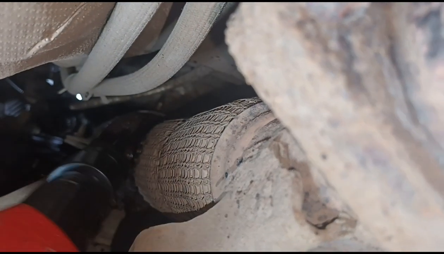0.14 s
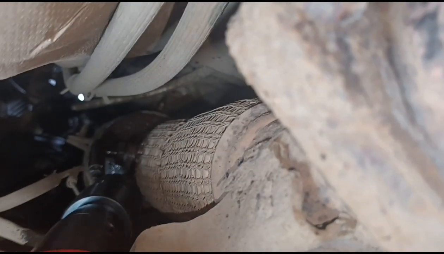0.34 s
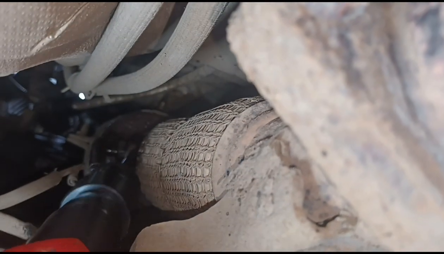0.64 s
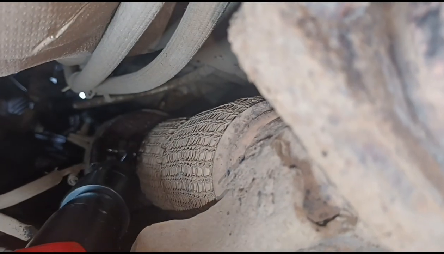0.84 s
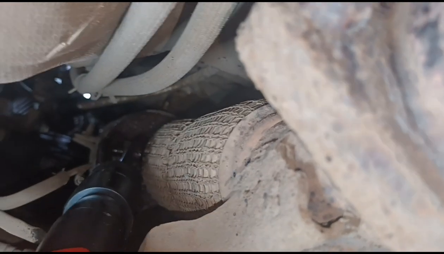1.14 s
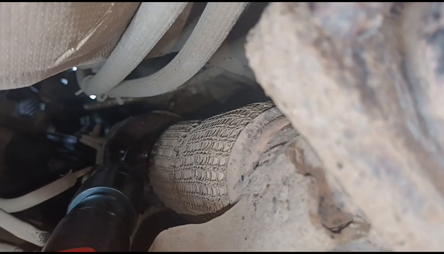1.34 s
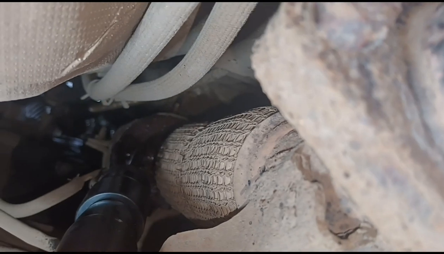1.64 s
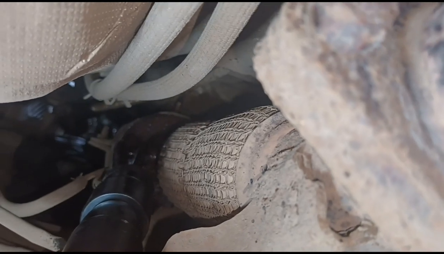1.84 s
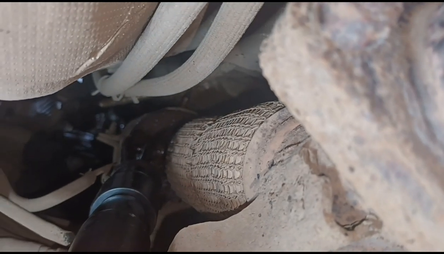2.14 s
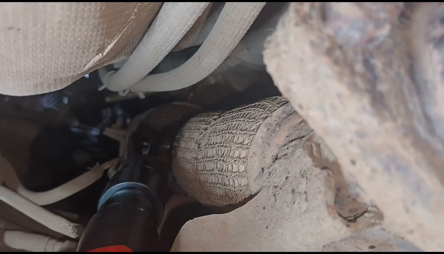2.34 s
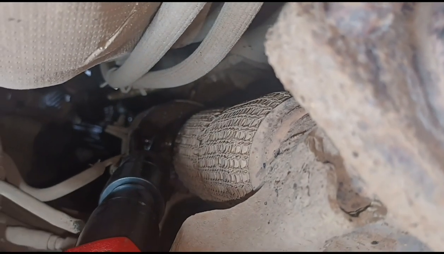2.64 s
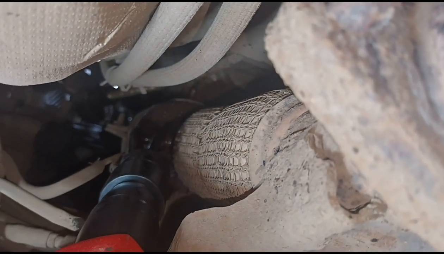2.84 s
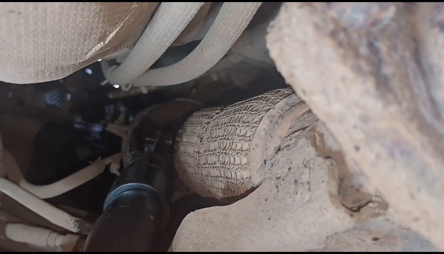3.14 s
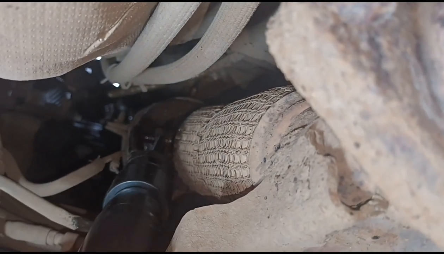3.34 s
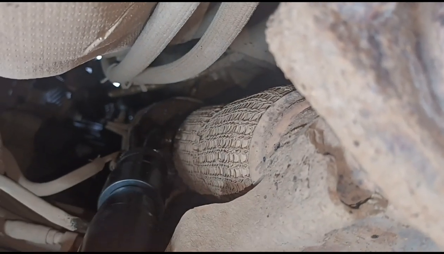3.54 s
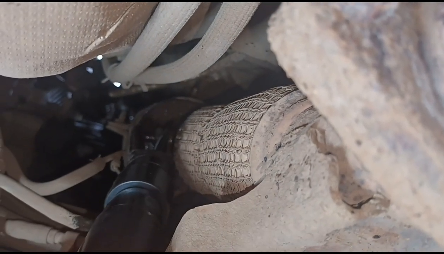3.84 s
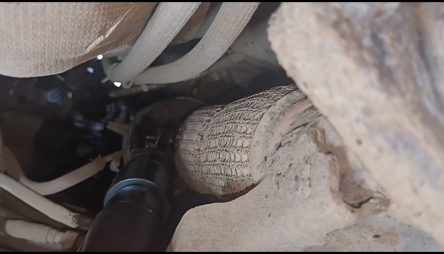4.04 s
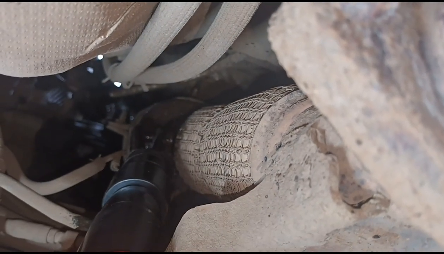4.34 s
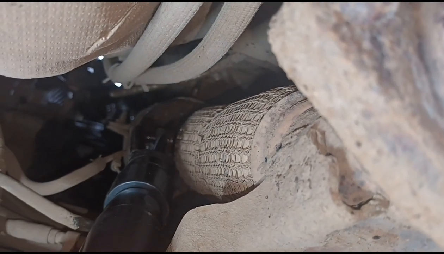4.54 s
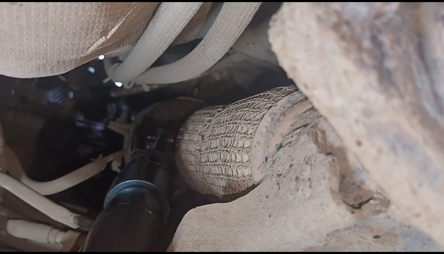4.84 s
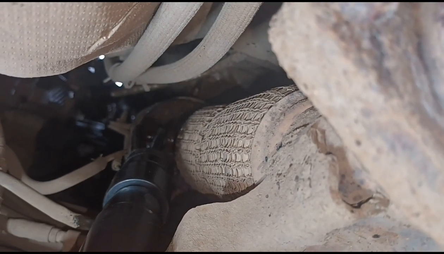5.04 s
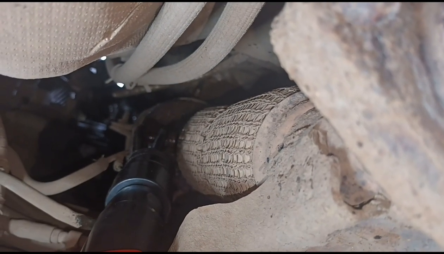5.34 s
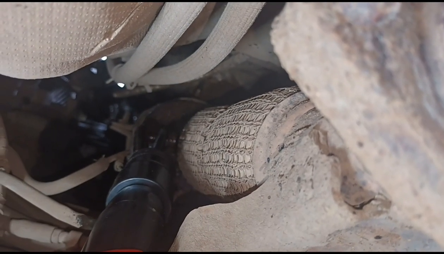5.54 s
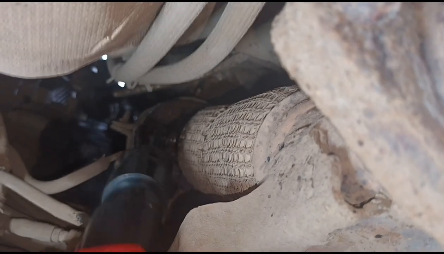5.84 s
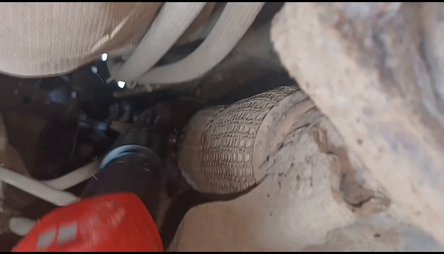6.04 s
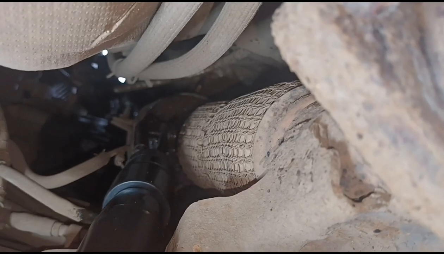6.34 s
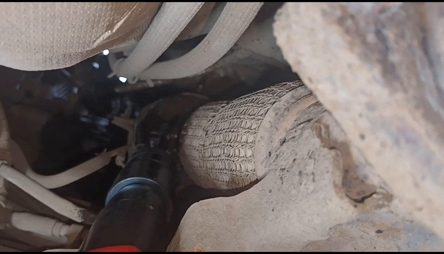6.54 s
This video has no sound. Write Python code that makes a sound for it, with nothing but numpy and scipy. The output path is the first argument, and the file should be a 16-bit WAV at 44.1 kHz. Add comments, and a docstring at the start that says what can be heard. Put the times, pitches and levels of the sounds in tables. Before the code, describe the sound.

An air tool is positioned against a seized metal part. First come gritty scraping, short high squeaks, soft hollow pipe bumps and bright jingles, then mostly quiet with small ticks and a few crisp steel clinks. Suddenly a very loud, fraction-of-a-second hammer burst cracks and blasts air, followed by a dull ringing hit and irregular chisel chatter as air bleeds away. Close microphone, grip rustle, hard metal reflections, quiet workshop.

```python
"""A tool scrapes, squeaks and jingles along a car's underbody, its loose chisel clinking; then an air hammer fires.
Scrapes are shaped noise with ringing grit, squeaks are gliding tones, clinks and bumps are struck modes with noise.
The burst is a few piston blows with exhaust blasts, a last dull stroke and a rattle as the air bleeds off.
The hand-held camera is very close, its grip sways and rubs, and the workshop is quiet."""
import sys
import numpy as np
from scipy import signal
from scipy.fft import rfft, irfft, next_fast_len
from scipy.io import wavfile
from scipy.ndimage import uniform_filter1d, map_coordinates

SR = 44100
rng = np.random.default_rng(int(sys.argv[2]) if len(sys.argv) > 2 else 0)


def materialize(psi):
    """Save the field psi as 16-bit PCM at rate SR to the path in sys.argv[1].

    A 1-D psi becomes a single channel; in a 2-D psi each row is a channel.
    """
    bounded = np.clip(np.atleast_2d(psi).T, -1, 1)
    quanta = np.round(bounded * 32767).astype(np.int16)
    wavfile.write(sys.argv[1], SR, quanta)


N = 295602
AGE = np.arange(SR) / SR  # time since a hit (s)

# Spectrum of the air leaving the exhaust. Each row: frequency in Hz, relative level in dB per Hz.
EXHAUST_SPECTRUM = [(88, -29.5), (150, 2.5), (213, -8.5), (254, -2.5), (391, -2.5), (774, -7),
                    (1080, -11.5), (1530, -4.5), (1900, -8.5), (4580, -5.5), (8070, -9.5), (9080, -5),
                    (12700, -15.5), (15100, -9.5), (16000, -33)]


def amp(db):
    """Decibels to gain."""
    return 10 ** (np.asarray(db) / 20)


def unit(x):
    """Scale to rms 1."""
    return x / np.sqrt(np.mean(x ** 2) + 1e-20)


def along(points, hz):
    """Read (Hz, value) points on a log frequency axis."""
    f, v = np.transpose(points)
    return np.interp(np.log(hz + 1), np.log(f + 1), v)


def wobble(rate):
    """A smooth random curve with rate knots a second."""
    knots = rng.standard_normal(int(N * rate / SR) + 4)
    return map_coordinates(knots, [np.arange(N) * rate / SR])


def filtered(x, response):
    """Multiply the spectrum of x by a response of frequency."""
    m = next_fast_len(x.shape[-1] + SR // 8)
    spectrum = rfft(x, m) * response(np.fft.rfftfreq(m, 1 / SR))
    return irfft(spectrum, m)[..., :x.shape[-1]]


def noise(spectrum, size=N):
    """Coloured stereo noise of rms 1, with a left-right likeness set per frequency."""
    # Each row: frequency in Hz, left-right likeness (correlation).
    likeness = [(40, 0.26), (150, 0.8), (500, 0.12), (1500, 0.027), (12000, 0.079)]

    def response(hz):
        turn = np.arccos(np.clip(along(likeness, hz), -1, 1)) / 2
        return amp(along(spectrum, hz)) * [np.cos(turn), np.sin(turn)]

    mid, side = filtered(rng.standard_normal((2, size)), response)
    return unit(np.array([mid + side, mid - side]))


def patchy(x, depth_db):
    """Short-lived resonances come and go in a noise as the contact or the air path changes."""
    z = signal.stft(x, nperseg=512)[2]
    field = uniform_filter1d(rng.standard_normal(z.shape[1:]), size=4, axis=0)
    field = uniform_filter1d(field, size=9, axis=1)
    return unit(signal.istft(z * amp(depth_db * unit(field)), nperseg=512)[1][:, :N])


def fade(t60, attack):
    """Envelope of a hit: exponential rise and decay."""
    return np.exp(-np.log(1000) * AGE / t60) * (1 - np.exp(-AGE / attack))


def ring(modes, attack, scatter_db, size=SR):
    """Struck modes (Hz, dB, t60 s), reaching each microphone at its own strength and phase."""
    t, out = AGE[:size], 0
    for hz, db, t60 in modes:
        strength = amp(db + scatter_db * rng.standard_normal((2, 1)))
        tone = np.sin(2 * np.pi * (hz * t + rng.random((2, 1))))
        out = out + strength * np.exp(-np.log(1000) * t / t60) * tone
    return out * (1 - np.exp(-t / attack))


def grit(hz, spread, cycles, scatter_db, count):
    """Half a second of tiny steel contacts: damped notes near hz, each 60 dB down after some cycles."""
    t = AGE[:SR // 50]
    start = rng.integers(SR // 2, size=(count, 1))
    pitch = hz * np.exp(spread * rng.standard_normal((count, 1)))
    strength = amp(scatter_db * np.minimum(rng.exponential(size=(count, 1)), 2))
    decay = np.exp(-np.log(1000) * t * pitch / cycles)
    notes = strength * decay * np.sin(2 * np.pi * (pitch * t + rng.random((2, count, 1))))
    where = (start + np.arange(len(t))).ravel()
    return unit(np.array([np.bincount(where, side.ravel(), SR)[:SR // 2] for side in notes]))


def stroke(s, length, attack, fall_db_per_s, swell_db=0):
    """Envelope of a movement: it rises, lasts for its length while swelling by swell_db, then dies away."""
    t = np.arange(N) / SR - s
    held_db = swell_db * (np.clip(t / length, 0, 1) - .5)
    return np.clip(t / attack, 0, 1) * amp(held_db - fall_db_per_s * np.maximum(t - length, 0))


def sides(pan_db):
    """Left and right gains for a left-minus-right level difference."""
    return amp(np.array([[.5], [-.5]]) * pan_db)


def add(track, s, sound):
    """Mix a sound into the track at time s."""
    room = track[:, round(s * SR):][:, :sound.shape[-1]]
    room += sound[..., :room.shape[1]]


def quiet_workshop():
    """The workshop at rest is a steady, faint noise, strongest in the bass."""
    # Each row: frequency in Hz, relative level in dB per Hz.
    rest_spectrum = [(12, -31), (20, -10), (65, -7), (182, -11.5), (270, -12.5), (590, -27.5), (897, -23),
                     (1300, -24), (2670, -28), (3440, -30), (9140, -33.5), (16000, -46)]
    return amp(-68.5) * noise(rest_spectrum)


def handling():
    """The grip sways and rubs on the camera body: faintly all the time, more at each shift."""
    # Each row: start in seconds, length in seconds, sway in dB, rub in dB, left minus right in dB.
    shifts = [(0.0, 0.053, -29, -39.5, 3), (0.374, 0.055, -51.5, -54.5, -12), (0.587, 0.021, -48.5, -49, 2),
              (0.879, 0.035, -53, -47.5, 0.5), (0.972, 0.037, -68, -53.5, -1), (1.184, 0.2, -53, -50, -0.5),
              (1.782, 0.27, -60.5, -52.5, -1), (2.386, 0.3, -61.5, -57, -2.5),
              (2.763, 0.023, -74, -49.5, -1), (3.076, 0.031, -60, -57.5, -3), (3.454, 0.057, -57, -67, 9.5),
              (3.649, 0.026, -47.5, -72, 3), (3.717, 0.042, -46, -56.5, -5.5),
              (3.872, 0.095, -55.5, -68, -9), (4.215, 0.34, -66, -60.5, -1.5), (5.752, 0.15, -45, -59.5, 7),
              (5.983, 0.039, -55, -56.5, -5), (6.163, 0.055, -49, -59.5, -9),
              (6.646, 0.043, -51, -72, -22.5)]
    # Each row: frequency in Hz, relative level in dB per Hz.
    sway_spectrum = [(11, -64.5), (18, -1.5), (75, 6), (92, -1.5), (110, -0.5), (140, -35.5), (240, -120)]
    rub_spectrum = [(41, -28.5), (70, -4.5), (123, -4), (215, -7.5), (306, -16.5), (338, -23.5), (600, -28),
                    (780, -43.5), (1320, -120)]
    restless_db, rest_sway_db, rest_rub_db = 1.5, -66, -66
    restless = amp(restless_db * wobble(11))
    sway, rub = amp(rest_sway_db) * restless, amp(rest_rub_db) * restless
    for s, length, sway_db, rub_db, pan_db in shifts:
        move = sides(pan_db) * stroke(s, length, attack=0.0062, fall_db_per_s=227)
        sway = np.maximum(sway, amp(sway_db) * move)
        rub = np.maximum(rub, amp(rub_db) * move)
    return sway * noise(sway_spectrum) + rub * noise(rub_spectrum)


def slides():
    """Tool and hose catch on countless small ridges: hiss, rasp, and grit ringing at the spot touched."""
    # Each row: start, rise and length in seconds, rasp in dB, hiss in dB, grit in dB, grit pitch in Hz.
    strokes = [(0.093, 0.13, 0.17, -41.5, -50, -45.5, 4700), (0.251, 0.03, 0.079, -54, -56.5, -52, 2790),
               (0.335, 0.015, 0.064, -44.5, -43.5, -46, 2440), (0.405, 0.022, 0.068, -54.5, -62, -57, 1750),
               (0.934, 0.018, 0.066, -56, -49.5, -51, 1744), (1.393, 0.018, 0.026, -67, -63, -62, 1940),
               (1.486, 0.06, 0.091, -55, -48, -58, 2160), (2.069, 0.021, 0.071, -65.5, -52.5, -64, 2210),
               (2.194, 0.02, 0.076, -71, -73, -71, 1990), (2.482, 0.045, 0.2, -75, -77.5, -76.5, 2070),
               (2.689, 0.084, 0.086, -59, -56, -56.5, 2750), (2.775, 0.014, 0.015, -52, -53.5, -50, 1680),
               (2.995, 0.027, 0.093, -60.5, -65, -63, 5500), (3.273, 0.007, 0.015, -63, -72.5, -63, 1470),
               (3.311, 0.034, 0.045, -61.5, -53.5, -59.5, 4670),
               (3.371, 0.039, 0.08, -69.5, -65.5, -67, 2240), (2.814, .01, 0.013, -72, -67, -66, 1950),
               (3.802, 0.037, 0.053, -79, -74, -70, 1930), (3.9, 0.016, 0.054, -71, -69.5, -68, 2110),
               (3.949, 0.034, 0.12, -80, -76, -78.5, 2100), (4.554, 0.0081, 0.05, -69.5, -56.5, -68, 2450),
               (5.167, .02, 0.039, -81.5, -75, -77, 4790)]
    # Each row: frequency in Hz, relative level in dB per Hz.
    rasp_spectrum = [(290, -37.5), (500, -15.5), (770, -22.5), (892, -19), (1080, -1.5), (1350, -2),
                     (1720, -4), (2180, -17), (2740, -9), (3200, -13), (4500, -12.5), (5850, -34.5),
                     (9900, -120)]
    hiss_spectrum = [(2060, -22.5), (3500, -13), (5430, 2), (6610, 3.5), (8050, -5.5), (9560, 3),
                     (12300, -22.5), (14800, -18), (16000, -15.5)]
    fall_db_per_s = 302.5
    rasp_swell_db, hiss_swell_db = 6, -5.5  # the hand presses harder through a stroke
    rasp, hiss, grains = np.zeros(N), np.zeros(N), np.zeros((2, N))
    for s, rise, length, rasp_db, hiss_db, grit_db, hz in strokes:
        pressure = stroke(s, length, rise, fall_db_per_s, rasp_swell_db)
        rasp = rasp + amp(rasp_db) * pressure
        hiss = hiss + amp(hiss_db) * stroke(s, length, rise, fall_db_per_s, hiss_swell_db)
        crunch = grit(hz, spread=.075, cycles=40, scatter_db=4.5, count=500)
        add(grains, s, amp(grit_db) * crunch * pressure[round(s * SR):][:SR // 2])
    catching = unit(amp(2 * wobble(140) + 2.2 * wobble(900)))
    rasping = rasp * patchy(noise(rasp_spectrum), depth_db=4.0)
    hissing = hiss * patchy(noise(hiss_spectrum), depth_db=3.0)
    return catching * (rasping + hissing) + grains


def squeaks():
    """Metal sticks and slips: a short rough tone that mostly sinks as the slip slows. Two rows instead carry on
    the high note of the pipework woken by a bump, and one the note of a struck spot."""
    # Each row: start in seconds, length in seconds, pitch in Hz, level in dB, drop in pitch as a share, jitter
    # of the pitch as a share. The rows at 0.01 s and 0.944 s are the high note of the pipework, woken by the
    # bumps there; the last row is the ringing note of the clink at 5.968 s.
    slips = [(0.01, 0.086, 2660, -58, .02, .035), (0.251, 0.086, 2830, -44, .02, .025),
             (0.337, 0.06, 2660, -43, 0.037, 0.034), (0.448, 0.071, 2750, -48, 0.0086, 0.021),
             (0.631, 0.064, 3160, -51.5, .03, 0.055), (0.655, 0.099, 3660, -57, .05, .03),
             (0.714, 0.055, 3090, -53, .06, 0.059), (0.725, 0.075, 2780, -50, 0, .02),
             (0.944, 0.051, 2755, -45, 0.023, 0.026), (2.001, 0.075, 4640, -63, 0.016, 0.05),
             (2.038, 0.057, 3380, -63.5, .04, 0.045), (2.688, 0.13, 2760, -56, 0.0071, 0.014),
             (3.558, 0.018, 2900, -44.5, .12, 0.075), (3.799, 0.13, 3800, -54.5, 0.22, 0.072),
             (5.362, 0.018, 2810, -53.5, .03, .08), (5.966, 0.013, 1574, -44, 0.037, 0.037)]
    out = np.zeros((2, N))
    for s, length, hz, db, sag, rough in slips:
        size = round(length * SR)
        pitch = hz * (1 + sag * np.linspace(.5, -.5, size) + rough * wobble(895)[:size])
        phase = np.cumsum(pitch) / SR + rng.random((2, 1))
        add(out, s, amp(db) * np.hanning(size) * np.sin(2 * np.pi * phase))
    return out


def jingles():
    """The loose sleeve of the hose coupling rings high and thin, with a fizz of tiny rebounds."""
    # Each row: start in seconds, level in dB before trim.
    hits = [(0.4225, -37), (0.463, -48.5), (0.6254, -29), (0.636, -29), (0.7162, -30.5), (0.7426, -45),
            (0.7733, -47.5)]
    # Each row: frequency in Hz, level in dB, t60 in seconds.
    sleeve_modes = [(2840, -20.5, 0.28), (3250, -21, 0.14), (4270, -27, 0.14), (6860, -19.5, 0.15),
                    (9200, -1, 0.053), (9320, 10.5, 0.033), (9670, 17.5, 0.0093), (14580, -7, 0.046),
                    (14960, -5.5, 0.046)]
    fizz_spectrum = [(1000, -19.0), (5000, -15.0), (8500, -14.5), (9600, 2.5), (12000, -31.5),
                     (14800, -7.5), (16000, -15.0)]
    out = np.zeros((2, N))
    for s, db in hits:
        fizz = noise(fizz_spectrum, size=SR) * fade(t60=0.12, attack=0.0038)
        rocking = 1 + .5 * wobble(120)[:SR]
        sleeve = rocking * ring(sleeve_modes, attack=.004, scatter_db=2.5)
        add(out, s, amp(db - 4.5) * (sleeve + amp(-5.0) * fizz))
    return out


def bumps():
    """Soft contacts with the underbody give a thud and wake a hollow, quickly damped note of the pipework."""
    # Each row: start in seconds, level in dB, thud and ring in dB re level, all before trim.
    contacts = [(0.011, -37, 11.5, -9), (0.049, -31, -17, -17.5), (0.208, -28.5, 1, -4),
                (0.262, -38, -8, 0), (0.604, -51, -12, -10), (0.891, -41.5, -6, -2), (0.95, -30, -8.5, -11),
                (2.729, -35, -1, -9), (2.783, -62, 18.5, -44), (3.104, -33, 8.5, -24),
                (3.498, -47, -18.5, -2), (4.569, -52.5, -12, -4), (6.338, -43.5, 21.5, 1.5),
                (6.458, -42, -11.5, -1)]
    # Each row: frequency in Hz, level in dB, t60 in seconds.
    pipe_modes = [(890, 0, .1), (860, -7, .07), (925, -7, .07), (893, -13, .3), (2730, -16, .1),
                  (2650, -19, .06)]
    thud_spectrum = [(40, -27.5), (130, -15.0), (230, -8.5), (335, 2.0), (450, -14.5), (900, -49), (2000, -120)]
    rise_s = 0.016
    swell = np.minimum(AGE / rise_s, 1)
    out = np.zeros((2, N))
    for s, db, thud_db, ring_db in contacts:
        thud = noise(thud_spectrum, size=SR) * fade(t60=0.17, attack=0.015)
        rough = 1 + .35 * wobble(70)[:SR]
        note = swell * rough * ring(pipe_modes, attack=rise_s, scatter_db=1.5)
        add(out, s, amp(db + thud_db - 14.5) * thud)
        add(out, s, amp(db + ring_db + 6.5) * amp([[3], [-5]]) * note)  # stronger on the left
    return out


def clinks():
    """Loose steel contacts, and the click of the air valve opening: a crack and the chisel's modes, coloured by
    each touch, and the struck spot's note."""
    # Each row: start in seconds, level in dB, body and top in dB re level, t60 of the crack in seconds, note of
    # the spot struck in Hz, note in dB re level; levels before trim. The row at 5.412 s is the air valve
    # clicking open at the trigger.
    touches = [(0.008, -44.5, 0, -2.5, 0.15, 1563, -7), (0.146, -28, -5, -50, .06, 3580, -11),
               (0.232, -26, -6, -13, 0.061, 1810, -21), (0.259, -19, -8.5, -15.5, 0.064, 1850, -25),
               (0.812, -59, 5, -12, 0.026, 2780, -13), (0.87, -58, 0.5, -6, 0.088, 2470, -3),
               (0.951, -38.5, -25, -4.5, 0.074, 2630, -7), (1.502, -46.5, -7, -6, .054, 2230, -6),
               (2.081, -38, -27, -4, 0.12, 4600, -18), (2.785, -41.5, 7.5, -14, .04, 3480, -2),
               (3.076, -29, -6.5, -19, 0.017, 1390, -22), (3.1, -37.5, 0.5, -41, 0.038, 3250, -6),
               (3.143, -28, -5.5, -14, 0.037, 1457, -7.5), (3.149, -13, -13, -17, .03, 8950, -22),
               (3.183, -44, -0.5, -29, 0.043, 3400, -11), (3.288, -56, 2, -25, 0.038, 1414, 3),
               (3.439, -17, -5.5, -8.5, 0.043, 3340, -16), (3.445, -10.5, -9, -10, 0.052, 2153, -19),
               (3.451, -16, -4.5, -13.5, 0.06, 9030, -16.5), (3.49, -45, 3.5, -30.5, 0.035, 3380, -1),
               (3.502, -30.5, 3, -17, .04, 2165, -3), (3.505, -44.5, 5, -20, .04, 1017, 6.5),
               (3.519, -49.5, 10.5, -31.5, 0.058, 2170, 10), (3.583, -47, -0.5, -35, 0.028, 3100, -9),
               (4.559, -47.5, -16.5, -7.5, 0.046, 4340, -14),
               (4.842, -42.5, -17.5, -16.5, 0.042, 4770, -27), (5.034, -53.5, -3, -16.5, 0.032, 2688, -12),
               (5.412, -25, -10, -15.5, .04, 3302, -19.5), (5.676, -16, -23, -12.5, 0.059, 5560, -18),
               (5.698, -6.5, -18.5, -14.5, 0.044, 2880, -31), (5.745, -25, 1.5, -18, 0.045, 1600, -16),
               (5.761, -19.5, -3, -26, .021, 2960, -14), (5.782, -16.5, -17, -6.5, 0.028, 7100, -19),
               (5.828, -3.5, -19.5, -22.5, 0.023, 2913, -30.5),
               (5.866, -14, -13.5, -27.5, 0.029, 1820, -27), (5.914, -50, -8, -26, 0.022, 2950, -10),
               (5.968, -39, -2.5, -10, .05, 1545, -0.5), (6.052, -57.5, -1.5, -20, 0.03, 1590, -9)]
    # Each row: frequency in Hz, level in dB, t60 in seconds.
    chisel_modes = [(2165, -7.5, .1), (3448, -10, .065), (5170, -10, .055), (6627, -18, .05),
                    (7370, -9, .05), (8900, -13.5, .029), (8950, 6.5, 0.076), (9700, -7, .05),
                    (9700, -12, .047), (13590, -13.5, .042), (15340, -15.5, .035)]
    # Crack of steel on steel. Each row: frequency in Hz, relative level in dB per Hz.
    crack_spectrum = [(240, -60), (400, -33), (950, -14), (2120, -7), (2510, -11.5), (3420, 0.5),
                      (3870, -10), (7990, -11.5), (8630, -2), (9610, -1), (10900, -28), (16000, -22)]
    out, size = np.zeros((2, N)), SR // 4
    for s, db, body_db, top_db, crack_t60, note_hz, note_db in touches:
        crack = noise(crack_spectrum, size=size) * fade(crack_t60, attack=0.0012)[:size]
        seat = 1 + 0.01 * rng.standard_normal(len(chisel_modes))  # how the chisel sits shifts its modes
        seated = [(hz * k, level, t60) for (hz, level, t60), k in zip(chisel_modes, seat)]
        chisel = ring(seated, attack=0.001, scatter_db=1.5, size=size)
        colour = [(900, body_db + 9.5), (3000, body_db + 4.0), (5500, 0.93),
                  (9000, top_db + 5.5), (14000, top_db + 5.5)]
        clink = filtered(crack + amp(-11) * chisel, lambda hz: amp(along(colour, hz)))
        note = ring([(note_hz, note_db, .075)], attack=.0015, scatter_db=0.5, size=size)
        add(out, s, amp(db - 5.5) * clink + amp(db) * note)
    return out


def rattle():
    """Barely driven as the air bleeds off, the loose chisel chatters irregularly in its holder."""
    # Each row: pitch in Hz, level in dB, scatter of the pitch as a share.
    chatter = [(1580, -47.5, .05), (2902, -44.5, 0.046), (4205, -41, .42)]
    start_s, length_s = 5.66, 0.19
    out = np.zeros((2, N))
    for hz, db, spread in chatter:
        add(out, start_s, amp(db) * grit(hz, spread, cycles=50, scatter_db=6, count=220))
    return out * stroke(start_s, length_s, attack=.03, fall_db_per_s=433, swell_db=2.5)


def last_stroke():
    """With the pressure gone, the piston lands softly and the underbody rings on."""
    # Each row: frequency in Hz, level in dB, t60 in seconds.
    panel_modes = [(105, -15.5, 0.072), (248, -19, 0.047), (410, -42, 0.62), (494, -16.5, 0.041),
                   (600.6, -20.5, 0.1), (577, -45, 0.66), (594, -39, 0.71), (1560, -43, 0.563),
                   (1780, -36.5, 0.246), (2740, -37, 0.246)]
    out = np.zeros((2, N))
    add(out, 5.678, ring(panel_modes, attack=.0015, scatter_db=1))
    return out


def air():
    """The turbulent exhaust jet hisses and its draught buffets each microphone port, both following the flow."""
    trigger_s, cycling_s = 5.411, 5.421  # the valve cracks, the piston runs
    release_s, empty_s = 5.548, 5.866  # the trigger is let go, the hose is empty
    full_db, bleed_db, bleed_sag_db = -15, -37, 11.5  # the bleed weakens by the sag before it ends
    running = amp(full_db) * stroke(cycling_s, release_s - cycling_s, attack=0.011, fall_db_per_s=269.5)
    bleed = amp(bleed_db - bleed_sag_db / 2) * stroke(
        trigger_s, empty_s - trigger_s, attack=0.0019, fall_db_per_s=489, swell_db=-bleed_sag_db)
    flow = np.hypot(running, bleed)
    weak = 1 - flow / flow.max()  # at low pressure the valve flutters and the jet sputters
    # a narrow gap hisses higher
    leak = weak * noise([(3000, -35.5), (9000, -3.5), (12000, -2), (15300, 0.5), (16500, -9.5)])
    jet = flow * patchy(noise(EXHAUST_SPECTRUM), depth_db=2.5) + amp(-12.5) * flow * leak
    sputter = amp((1.5 + 2.5 * weak) * wobble(150))
    draught = np.roll(flow, round(0.013 * SR))  # the moving air arrives after its sound
    buffet = draught * noise([(15, -8.5), (32, -2.0), (55, -7.5), (110, -16.5), (300, -40.0), (1000, -79.0)])
    return jet * sputter + amp([[-12], [-7]]) * buffet


def hammer():
    """Each piston blow shakes the tool, rings the seized part and lets out a blast of air."""
    # Each row: start in seconds, level in dB, thump and treble in dB re level (levels before trim),
    # exhaust 1/e time in seconds.
    blows = [(5.43, -4, -28, -16, 0.029), (5.445, -5, -26, -14, 0.026), (5.476, 1.5, -24.5, -17, 0.016),
             (5.495, -5.5, -23, -14.5, 0.018), (5.515, -2.5, -18, -17, 0.02),
             (5.554, -5, -23, -11.5, 0.021), (5.603, -6, -15.5, -7.5, 0.018)]
    # The seized part. Each row: frequency in Hz, level in dB, t60 in seconds.
    part_modes = [(927, -8.5, 0.22), (1010, -7.5, 0.16), (1504, -2, 0.12), (2030, -5.5, 0.092),
                  (2373, -1, 0.09), (3444, -2, .11), (3764, -2.5, 0.12), (4440, -3, 0.098),
                  (5750, -2, 0.12), (5600, -3.5, 0.1), (6153, -0.5, .1), (7127, -7, .07), (8926, -1, 0.056),
                  (9400, -1, .05)]
    crack_spectrum = [(150, -6.5), (400, -5.0), (950, 3.5), (1300, -4.0), (2000, -4.5), (6000, -7.5),
                      (16000, -27.0)]
    thump_modes = [(66, 3.0, 0.11), (139.0, -8.0, 0.18), (260, -1.0, 0.022)]
    out = np.zeros((2, N))
    for s, db, thump_db, treble_db, length in blows:
        crack = amp(-8.0) * noise(crack_spectrum, size=SR) * fade(t60=0.066, attack=0.0017)
        puff = (1 - np.exp(-AGE / 0.0037)) * np.exp(-(AGE / length) ** 2)
        blast = amp(treble_db + 4.5) * noise(EXHAUST_SPECTRUM, size=SR) * puff
        thump = amp(thump_db + 6.5) * ring(thump_modes, attack=0.00055, scatter_db=0.5)
        steel = amp(-20.5) * ring(part_modes, attack=.0008, scatter_db=3)
        add(out, s, amp(db - 1.5) * (crack + blast + steel + thump))
    return out


def underbody(x, reach_s, count):
    """Close metal walls add a cluster of early reflections, different for each microphone."""
    delays = np.round(rng.uniform(.0004, reach_s, (2, count)) * SR).astype(int)
    taps = np.array([np.bincount(side, rng.standard_normal(count), SR // 10) for side in delays])
    taps /= np.linalg.norm(taps, axis=1, keepdims=True)
    walls = signal.fftconvolve(x, taps, axes=1)[:, :N]
    share = lambda hz: np.clip(along([(500, 0), (1200, .15), (3000, .5)], hz), 0, .8)
    direct = filtered(x, lambda hz: np.sqrt(1 - share(hz)))
    return direct + filtered(walls, lambda hz: np.sqrt(share(hz)))


def workshop_echo(x):
    """A diffuse tail in which each frequency dies at its own speed."""
    # Each row: frequency in Hz, t60 in seconds.
    room_t60 = [(150, 0.53), (600, .65), (3000, 0.39), (12000, 0.18)]
    hz, t, z = signal.stft(rng.standard_normal((2, SR)), SR, nperseg=256)
    decay = np.exp(-np.log(1000) * t / along(room_t60, hz)[:, None])
    tail = signal.istft(z * decay, SR, nperseg=256)[1]
    return signal.fftconvolve(x, tail / np.linalg.norm(tail[0]), axes=1)[:, :N]


def scene():
    """The burst and the small noises around it, under the car and in the room."""
    # Side on which the tool touches the car. Each row: time in seconds, left minus right in dB.
    touch_side = [(0.1, 5.5), (1.0, 4), (1.5, 8), (2.15, 14.5), (2.8, 4.5), (3.14, -6), (3.45, 0.5),
                  (3.9, 3), (4.702, 3), (5.7, 1.5)]
    burst = underbody(hammer() + air(), reach_s=.008, count=40) + last_stroke() + rattle()
    pan = sides(np.interp(np.arange(N) / SR, *np.transpose(touch_side)))
    touching = underbody(clinks(), reach_s=.0035, count=14) + slides() + squeaks()
    fitting = pan * touching + jingles() + bumps()
    echo = workshop_echo(amp(-18.5) * burst + amp(-22.5) * fitting)
    return burst + fitting + echo + handling() + quiet_workshop()


def record(dry):
    """The camera rounds off the highest peaks, delays left against right and cuts all above its band limit."""
    left_lag_s, top_hz = 0.0011, 16350
    rounded = dry / (1 + np.abs(dry / .9) ** 4) ** (1 / 4)
    delay_s = left_lag_s * np.array([[.5], [-.5]])
    return filtered(rounded, lambda hz: np.exp(-2j * np.pi * hz * delay_s) * (hz < top_hz))


dry = scene()
out = record(dry)
materialize(out)
```